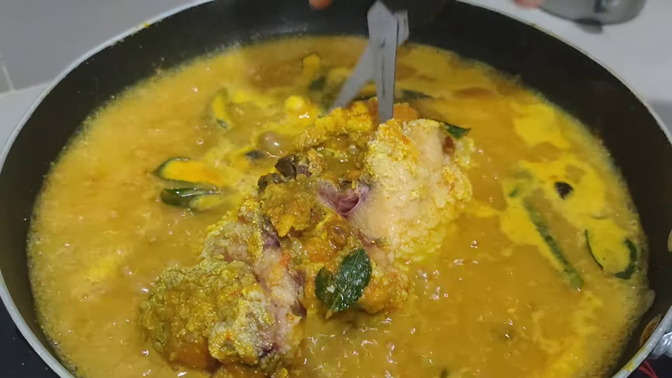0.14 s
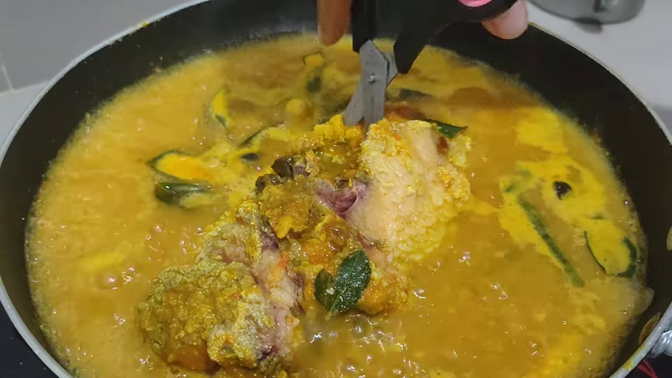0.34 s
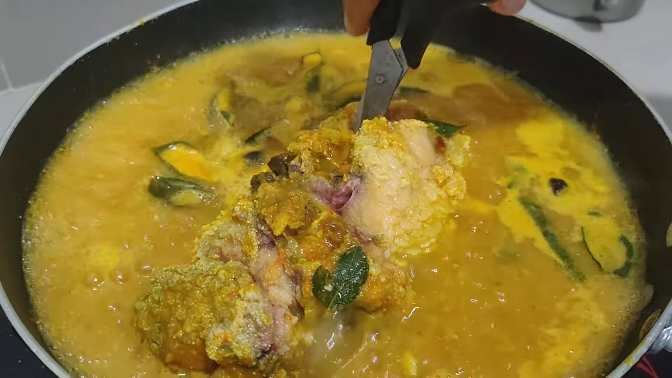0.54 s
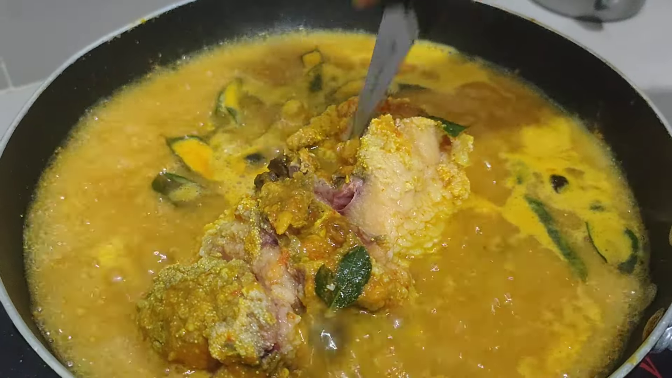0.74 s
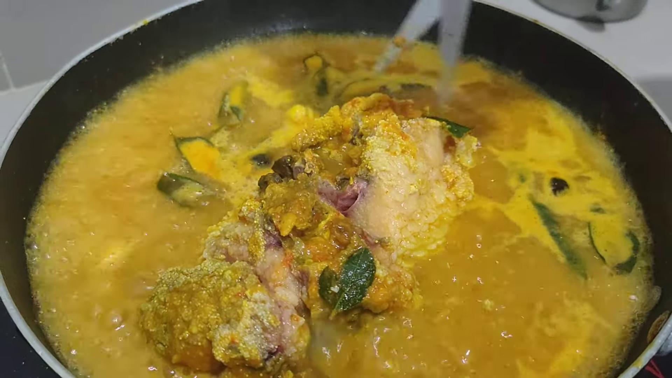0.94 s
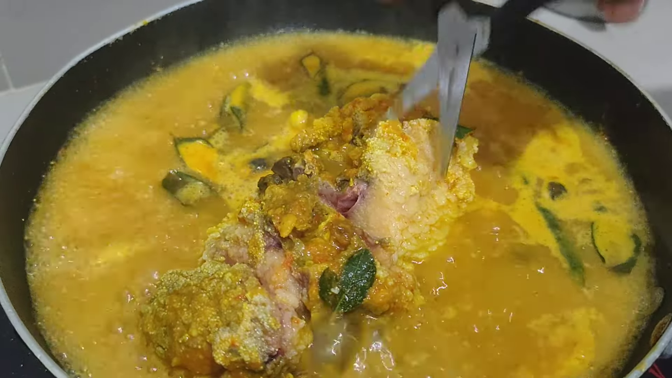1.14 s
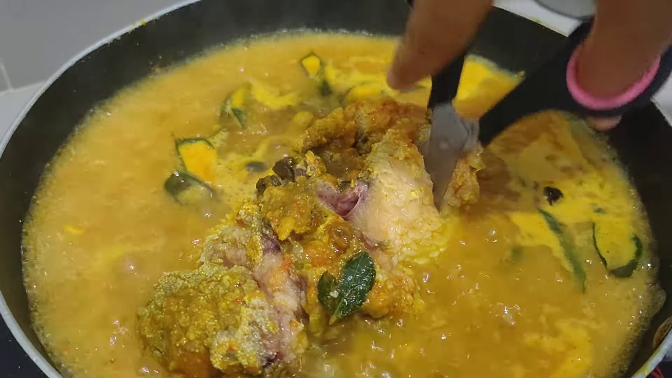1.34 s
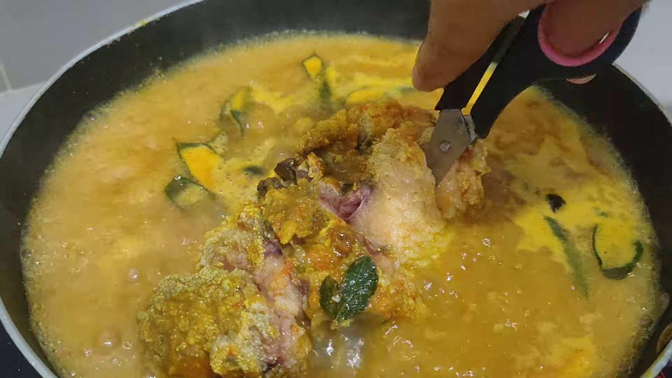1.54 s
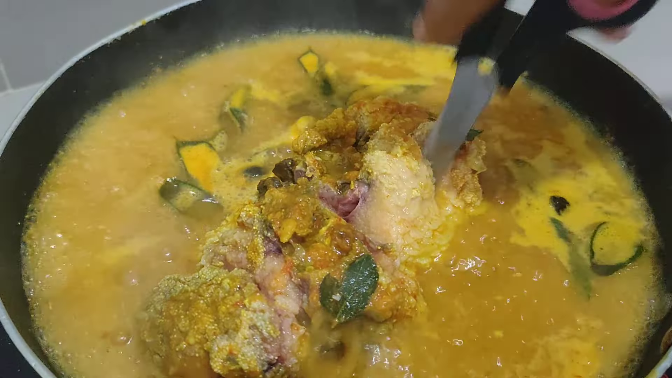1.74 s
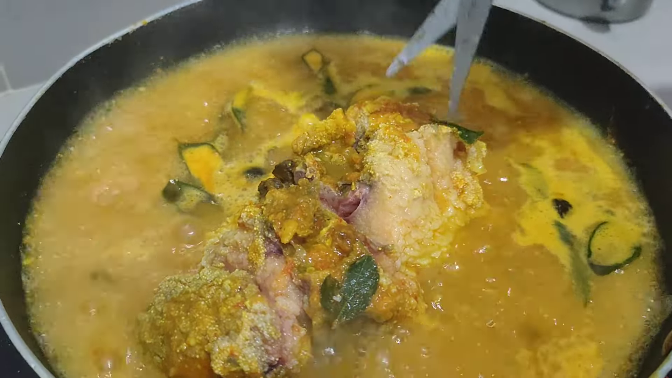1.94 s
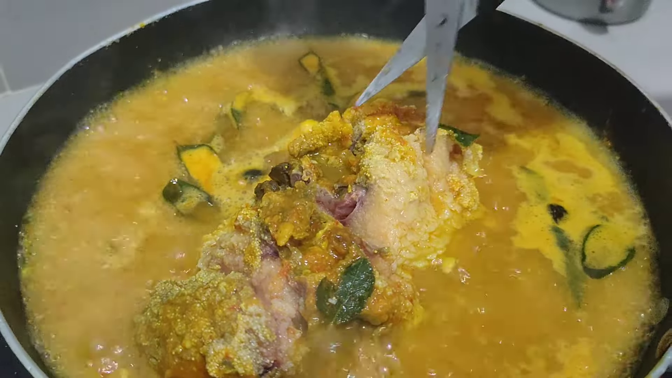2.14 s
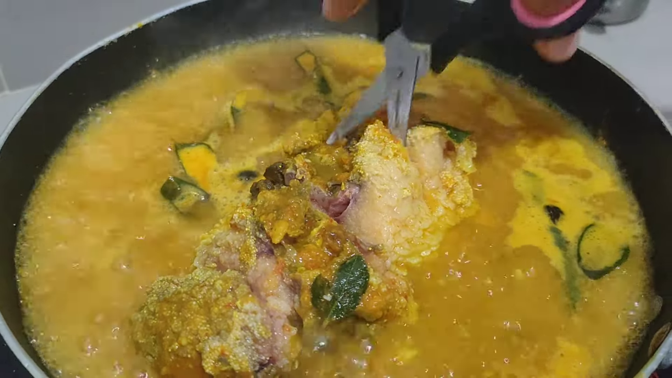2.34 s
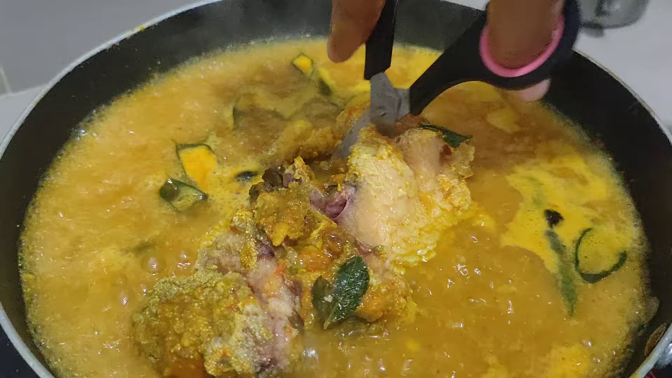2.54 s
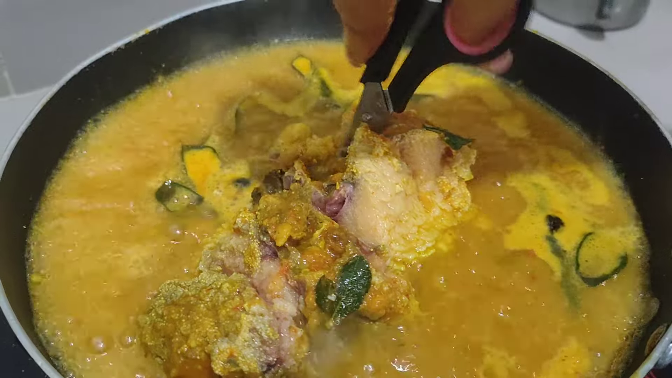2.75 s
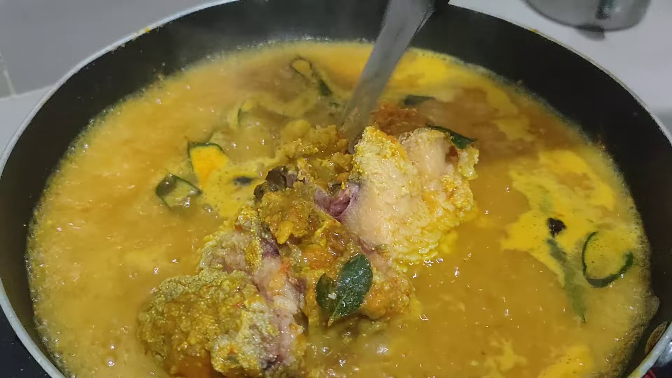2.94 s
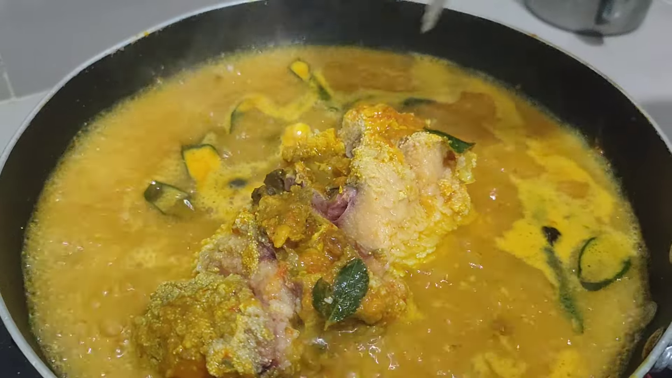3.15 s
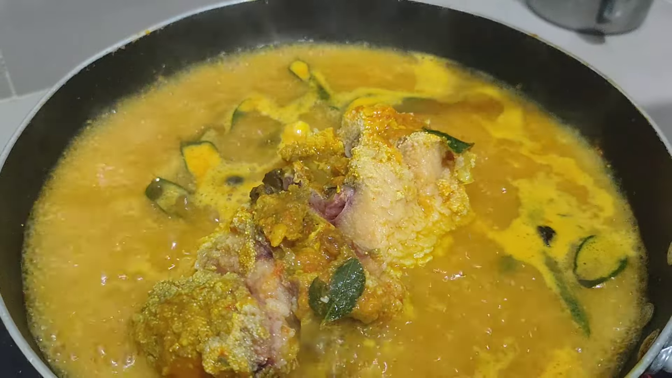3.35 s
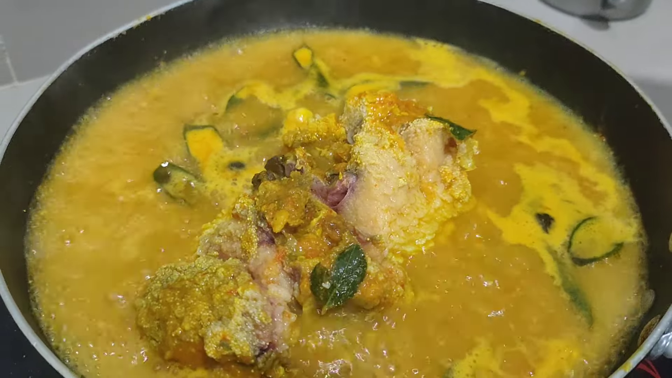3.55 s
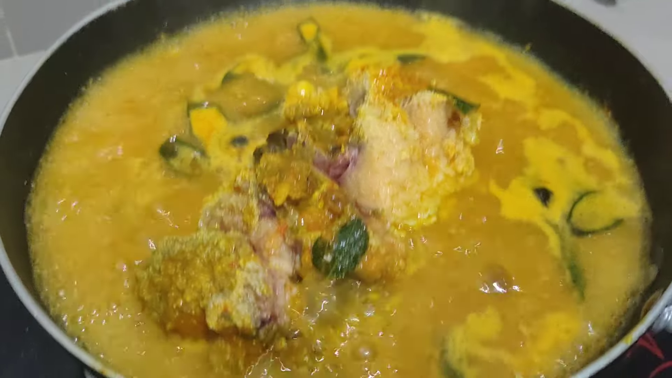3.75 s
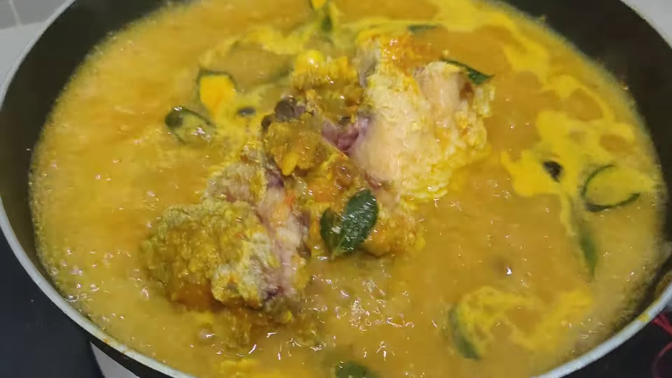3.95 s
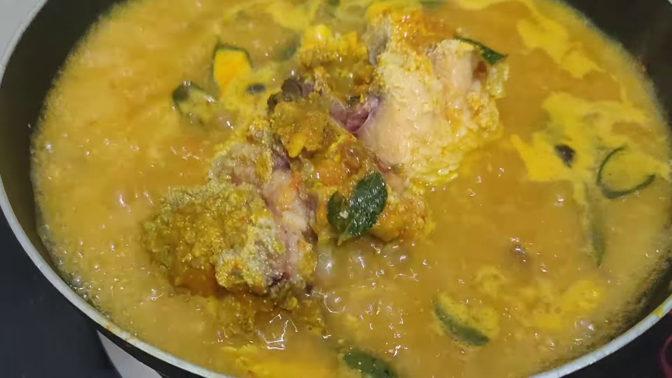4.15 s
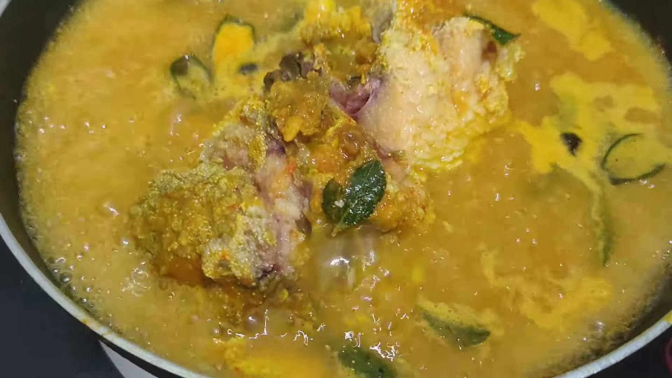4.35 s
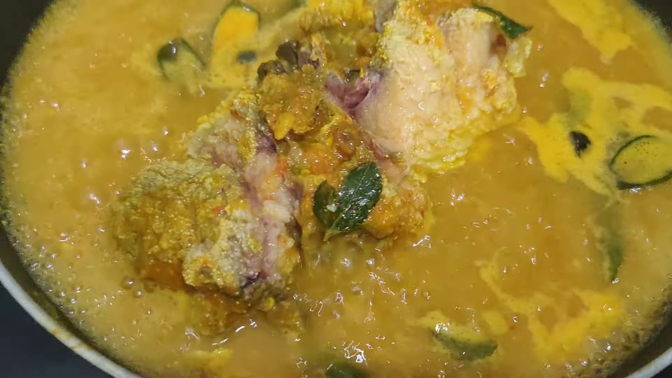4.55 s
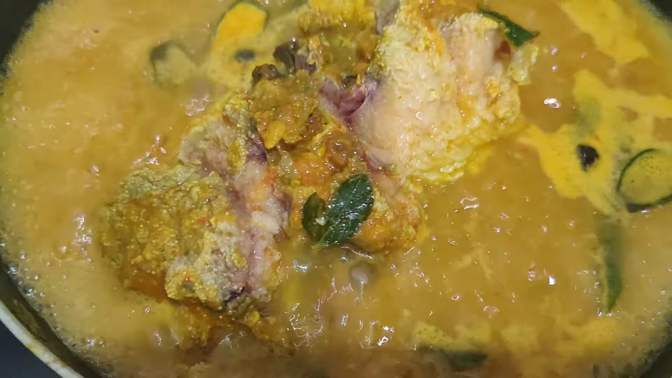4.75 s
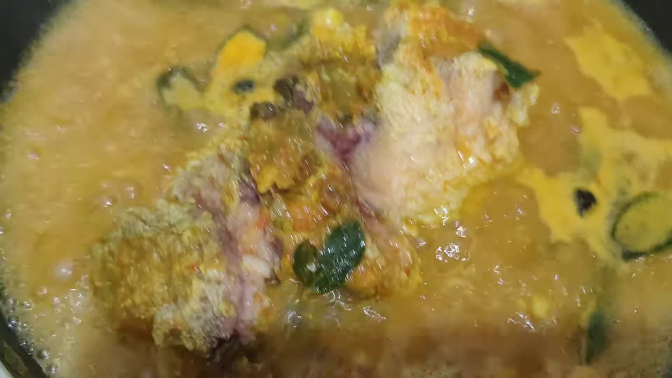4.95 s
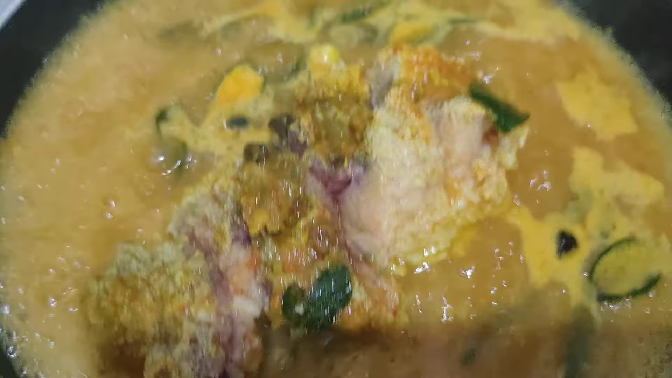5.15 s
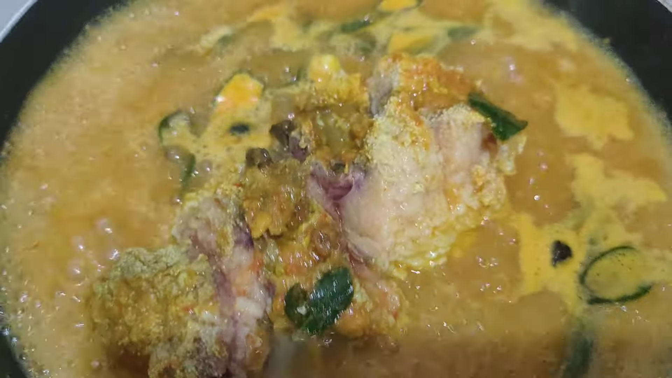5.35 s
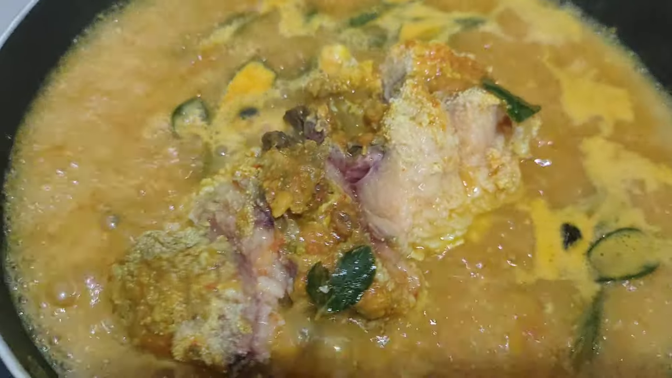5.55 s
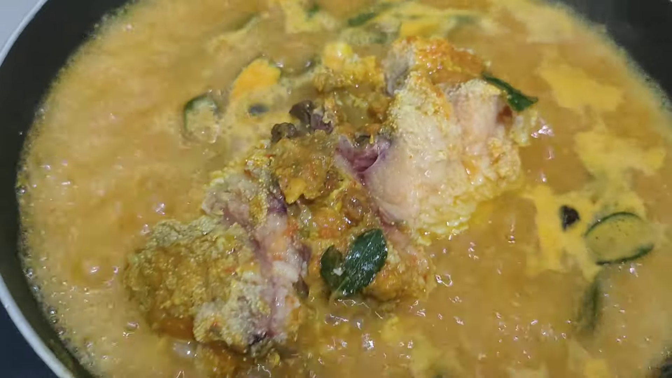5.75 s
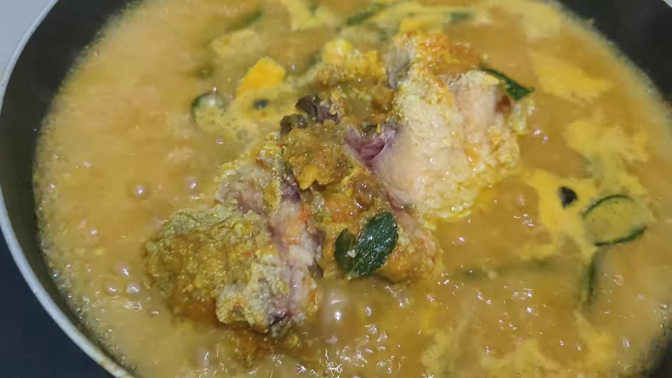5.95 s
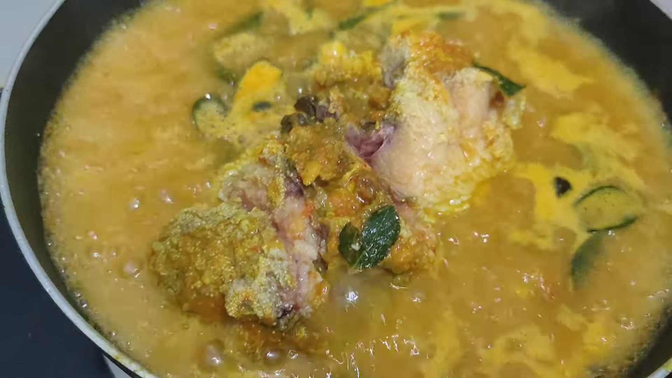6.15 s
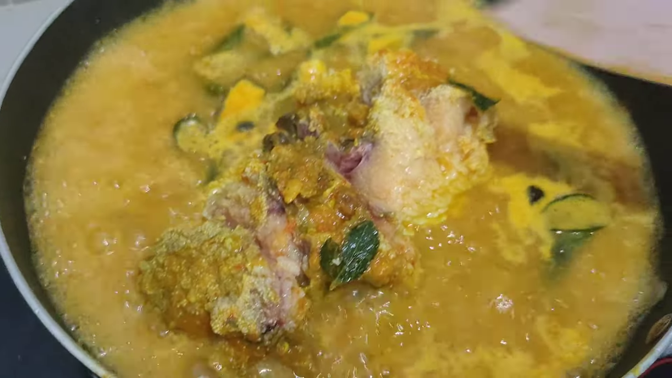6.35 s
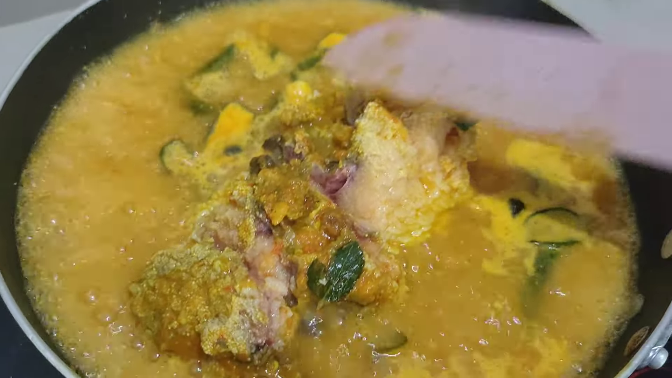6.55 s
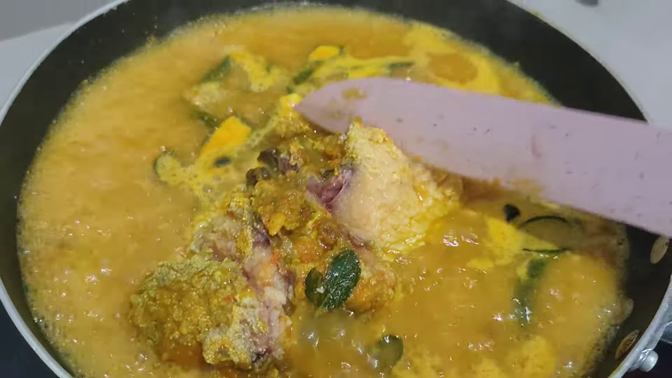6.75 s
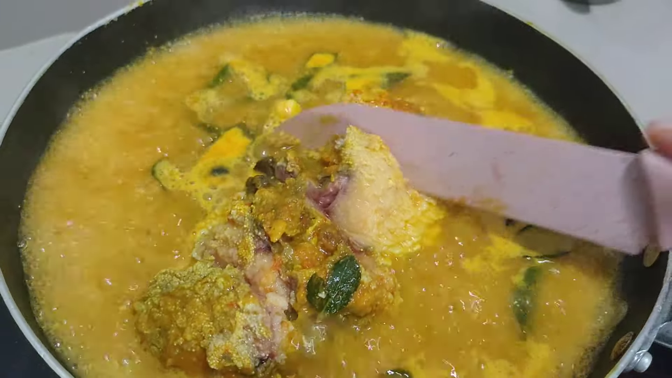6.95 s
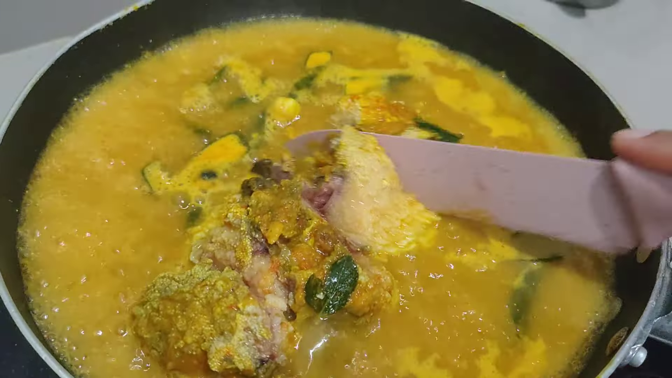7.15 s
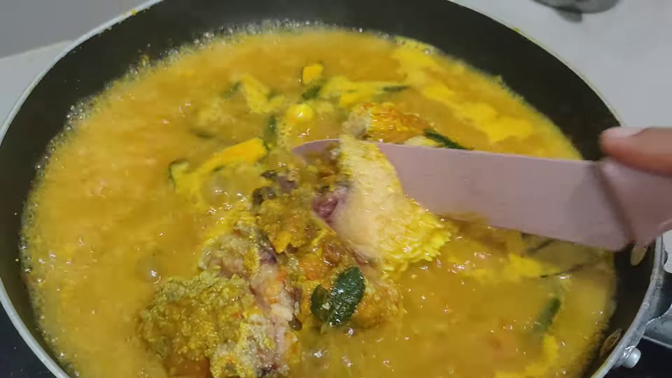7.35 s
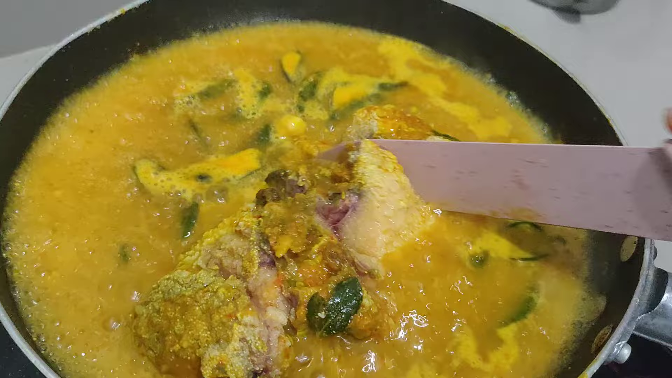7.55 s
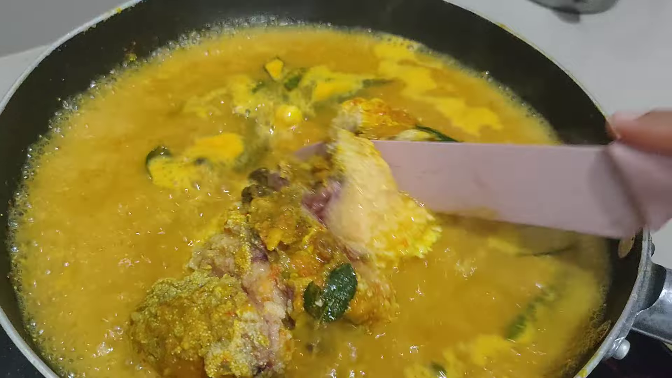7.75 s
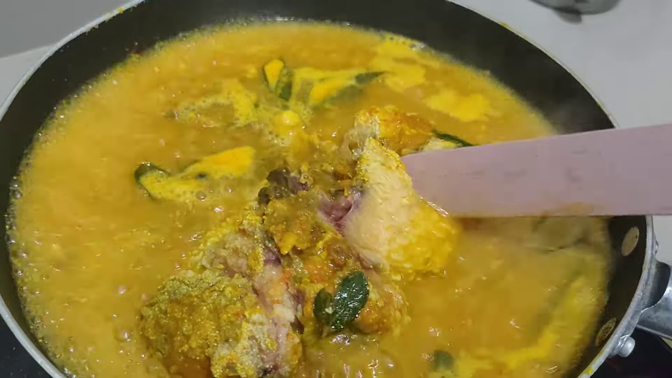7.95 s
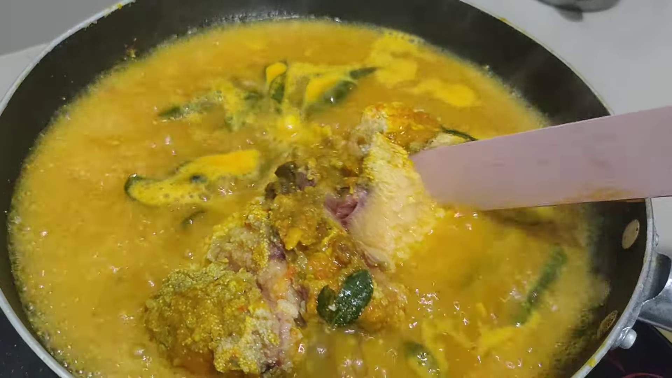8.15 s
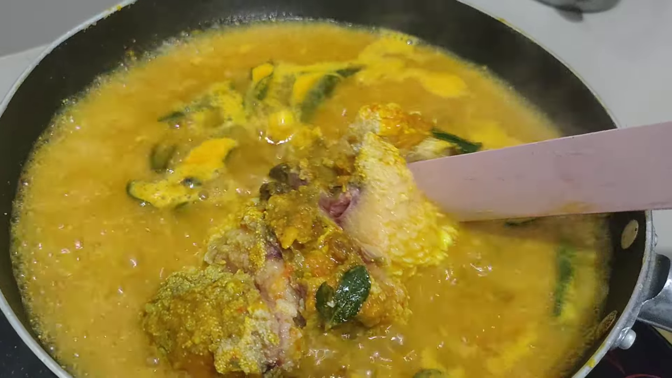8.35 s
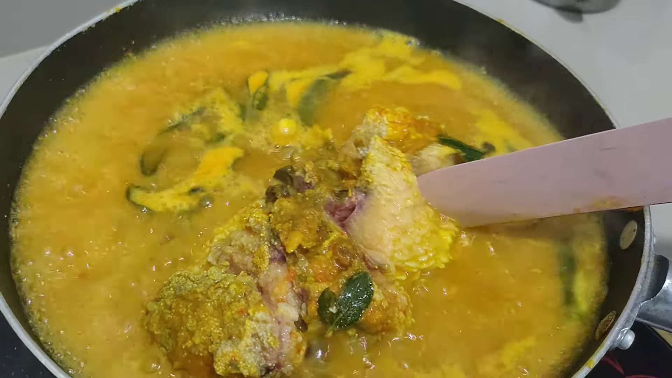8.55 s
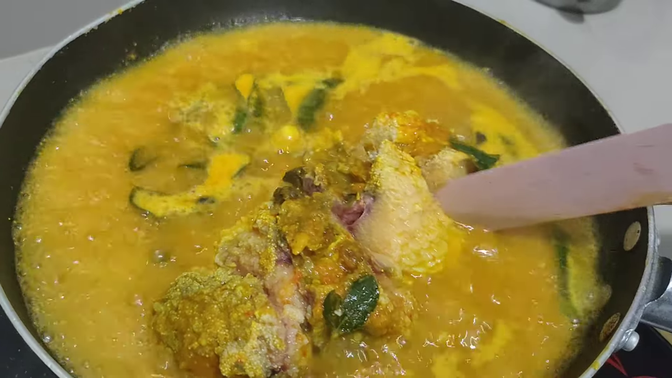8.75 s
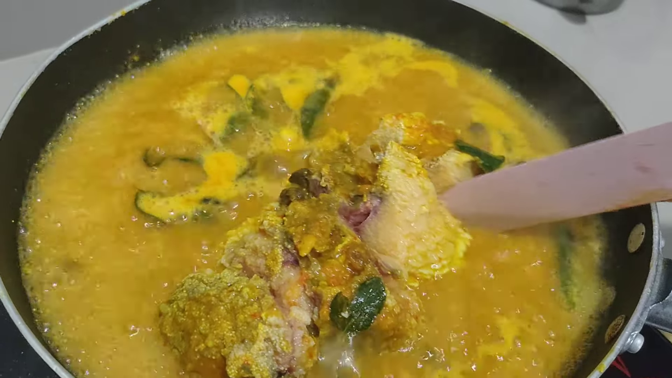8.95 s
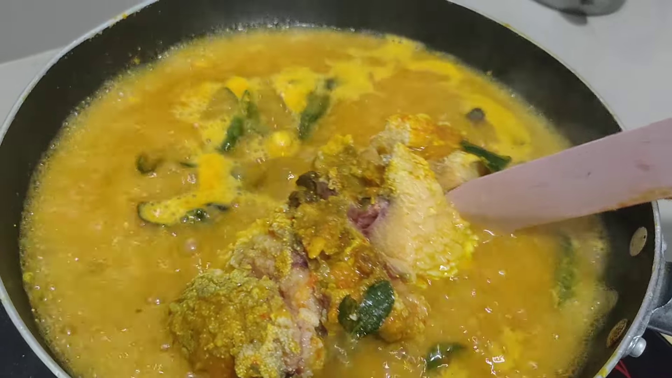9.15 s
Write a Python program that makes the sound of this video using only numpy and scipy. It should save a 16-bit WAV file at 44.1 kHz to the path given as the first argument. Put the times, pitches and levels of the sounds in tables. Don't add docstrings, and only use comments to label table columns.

```python
import sys
import numpy as np
from scipy import signal
from scipy.fft import rfft, irfft, next_fast_len
from scipy.io import wavfile
from scipy.ndimage import uniform_filter1d

SR = 44100
rng = np.random.default_rng(int(sys.argv[2]) if len(sys.argv) > 2 else 0)


def how_loud(loudness_db):
    steps = np.asarray(loudness_db, float) / 20
    return 10 ** steps


def put_to_file(sound):
    columns = np.atleast_2d(sound).T
    safe = np.clip(columns, -1, 1)
    whole_steps = np.round(safe * 32767)
    wavfile.write(sys.argv[1], SR, whole_steps.astype(np.int16))


N = 405279


def rms_one(x):
    return x / np.sqrt(np.mean(x ** 2) + 1e-20)


def in_time(rows):
    s, *columns = np.transpose(rows)
    return [np.interp(np.arange(N) / SR, s, c) for c in columns]


def drift(rate):
    r = np.exp(-80 * np.pi * rate / SR)
    slow = signal.lfilter([1], [1, -2 * r, r * r], rng.standard_normal(N // 40 + 2002))[2000:]
    return np.interp(np.arange(N) / 40, np.arange(len(slow)), rms_one(slow))


def butter(x, order, hz, kind="low"):
    return signal.sosfilt(signal.butter(order, hz, kind, fs=SR, output="sos"), x)


def colour(x, spectrum):
    size = next_fast_len(N)
    hz, level_db = np.transpose(spectrum)
    grid = np.log(np.arange(size // 2 + 1) * SR / size + 1)
    gain = how_loud(np.interp(grid, np.log(hz), level_db, left=-120, right=-120))
    return rms_one(irfft(rfft(x, size) * gain, size)[:N])


def resonate(x, hz, width_hz):
    r = np.exp(-np.pi * width_hz / SR)
    feedback = [1, -2 * r * np.cos(2 * np.pi * hz / SR), r * r]
    return signal.lfilter(np.array([1, 0, -1]) * (1 - r * r) / 2, feedback, x)


def ring(clicks, hz, t60):
    r, w = how_loud(-60 / (t60 * SR)), 2 * np.pi * hz / SR
    return signal.lfilter([0, np.sin(w)], [1, -2 * r * np.cos(w), r * r], clicks + 1e-18)


def add(out, s, sound):
    i = max(round(s * SR), 0)
    out[i:i + len(sound)] += sound[:N - i]


def plop(hz, cycles, start):
    u = np.arange(int(4 * cycles / hz * SR)) * hz / SR / cycles
    swell = u * np.exp(1 - u) * np.exp(-.3 * u ** 2 + 0.7)
    pitch = hz * (1.15 - (1.15 - start) * np.exp(-1.6 * u))
    return swell * np.sin(2 * np.pi * np.cumsum(pitch) / SR)


# start_s, hold_s, drone_db
GATE_OPENINGS = [(0, .1, -68), (0.49, 0.072, -63), (1.0, .1, -65), (1.65, 0.043, -66), (4.5, 0.11, -65),
                 (1.21, 0.12, -56.5), (1.8, 0.058, -59), (2.28, 0.11, -56), (2.57, 0.096, -53.5),
                 (3.07, 0.14, -53.5), (3.65, 0.18, -54.5), (3.95, .32, -55), (4.7, .15, -58),
                 (5.04, 0.11, -51), (5.27, .45, -56), (5.78, 0.14, -49.5), (6.23, .1, -52), (6.7, .2, -50),
                 (7.28, 0.075, -52), (7.57, .08, -48), (7.79, .13, -49), (8.21, 0.068, -57.5),
                 (8.6, 0.16, -55), (8.88, .3, -58)]
# start_s, length_s, depth_db
LULLS = [
    (0.238, .17, 14),
    (0.85, 0.29, 5),
    (3.42, 0.11, 3),
    (4.396, 0.048, 5),
    (6.119, 0.079, 7),
    (7.43, .07, 16),
    (7.968, 0.22, 15),
]


def suppressor():
    open_db_per_s, close_db_per_s, shut_db, lull_edge_s = 171, 140, -76, .03
    t, drone_db = np.arange(N) / SR, np.full(N, float(shut_db))
    for s, hold_s, db in GATE_OPENINGS:
        before_s = np.maximum(s - t, 0)
        after_s = np.maximum(t - s - hold_s, 0)
        drone_db = np.maximum(drone_db, db - open_db_per_s * before_s - close_db_per_s * after_s)
    drone_db = uniform_filter1d(drone_db, int(.06 * SR))
    lull_db = sum(db * np.clip(np.minimum(t - s, s + length - t) / lull_edge_s + 1, 0, 1)
                  for s, length, db in LULLS)
    return drone_db, -61 + .1 * (drone_db + 55.5) - lull_db


# pitch_hz, width_hz, level_db
ROOM_MODES = [(250, 79, 5), (345.2, 21, -4), (502, 50, -2.5)]


def flame(drone_db, rumble_db):
    noise = rng.standard_normal((3, N))
    drone = rms_one(resonate(resonate(noise[0], 100, 20), 96.4, 33))
    second = rms_one(resonate(resonate(noise[1], 168, 21), 163, 45))
    modes = sum(how_loud(db + 2.6 * drift(7)) * rms_one(resonate(resonate(noise[1], hz, width), hz, 3.06 * width))
                for hz, width, db in ROOM_MODES)
    stir_db = 16 * np.exp(-((np.arange(N) / SR - 6.62) / .07) ** 2)
    sub = rms_one(butter(noise[2], 2, 50))
    low = how_loud(drone_db) * drone + how_loud(0.59 * drone_db + .4 * rumble_db - 3) * second
    rumble = how_loud(rumble_db + 4.0 + 1.8 * drift(16)) * rms_one(modes)
    return low + rumble + how_loud(stir_db - 71.0) * sub


def kitchen(x, t60):
    t = np.arange(int(.4 * SR)) / SR
    tail = rng.standard_normal(len(t)) * how_loud(-60 * t / t60) * (t > .008)
    tail = butter(tail, 2, [300, 2300], "band")
    return signal.oaconvolve(x, tail / np.sqrt(np.sum(tail ** 2)))[:N]


# pitch_hz, level_db (per Hz)
SEETHE_SPECTRUM = [(290, -39.5), (500, -6.5), (637, -5.5), (899, -5), (1500, -0.5), (2360, -4.5),
                   (2600, -8), (3380, -48), (5720, -120)]


def seethe():
    return colour(rng.standard_normal(N) * how_loud(3.9 * drift(30)), SEETHE_SPECTRUM)


# pitch_hz, level_db (per Hz)
FIZZ_SPECTRUM = [(1290, -36.5), (2200, -13.5), (2380, -11.5), (3520, -8), (4030, -7), (5140, -14),
                 (6480, -2.5), (6900, 0.5), (7590, -6.5), (8500, -40.5), (11000, -67), (18700, -120)]


def fizz():
    sizes = how_loud(3.9 * np.minimum(rng.exponential(1, N), 5))
    cracks = sizes * rng.choice([-1, 1], N) * (rng.random(N) < 2500 / SR)
    hiss = rng.standard_normal(N) * how_loud(1.57 * drift(23))
    return colour(hiss + 0.69 * rms_one(cracks), FIZZ_SPECTRUM)


def small_bubbles(per_s):
    sizes = how_loud(3.6 * np.minimum(rng.exponential(1, N), 3)) * rng.choice([-1, 1], N)
    born = rng.random(N) < per_s * how_loud(3.5 * drift(22)) / SR
    pitches, dealt = np.geomspace(750, 2000, 10), rng.integers(0, 10, N)
    return rms_one(sum(signal.oaconvolve(sizes * born * (dealt == k), plop(hz, cycles=1.21, start=0.46))[:N]
                       for k, hz in enumerate(pitches)))


# start_s, level_4khz_db, level_7khz_db
SPITS = [(0.4816, -27.5, -18.5), (1.0853, -50, -38), (1.416, -52, -29), (1.4285, -46, -35),
         (1.4371, -30.5, -25.5), (1.6591, -41.5, -39), (1.962, -39, -30), (2.0134, -36.5, -54),
         (2.355, -43, -36), (2.6526, -32.5, -26.5), (2.837, -39.5, -48), (3.0198, -43, -33),
         (3.516, -40.5, -51), (3.8157, -49, -33), (3.9192, -37, -45.5), (3.9875, -49, -31),
         (4.1416, -44, -30.5), (4.4453, -42, -36), (4.484, -33.5, -34), (4.754, -38, -36),
         (5.1945, -35, -51), (6.59, -40, -46), (7.3176, -45, -30), (7.6518, -34.5, -41),
         (7.6662, -47.5, -34), (8.3697, -42, -41), (8.664, -47, -26), (8.948, -48, -34),
         (8.9837, -41.5, -31), (9.1356, -50, -34)]


def spits():
    low, high, t = np.zeros(N), np.zeros(N), np.arange(int(.05 * SR)) / SR - .01
    crack = np.where(t < 0, np.exp(t / 0.00023), np.exp(-t / 0.00082))
    spray = 0.13 * np.where(t < 0, np.exp(-(t / 0.0059) ** 4), np.exp(-t / 0.012))
    # middle and spread of start_s, level_4khz_db, level_7khz_db
    middle, spread = [N / SR / 2, -49.5, -42], [N / SR / 2, 3.5, 3.5]
    stray = rng.uniform(-1, 1, (30, 3)) * spread + middle
    rows = np.vstack([SPITS, stray])
    for (s, low_db, high_db), noise in zip(rows, rng.standard_normal((len(rows), 2, len(t)))):
        burst = (crack + spray) * np.tanh(0.63 * noise)
        add(low, s + t[0], how_loud(low_db + 21) * burst[0])
        add(high, s + t[0], how_loud(high_db + 18.0) * burst[1])
    port_low = resonate(resonate(low, 3770, 1200), 3500, 3000)
    port_high = resonate(resonate(high, 6670, 1500), 6680, 1500)
    return port_low + port_high


# start_s, peak_db, pitch_hz
TINY_BUBBLES = [
    (2.0118, -34, 3450),
    (2.9127, -35, 2620),
    (2.213, -39.5, 3500),
    (2.531, -38, 4000),
    (4.0444, -37, 2570),
    (7.7154, -40, 2390),
]
# start_s, peak_db, pitch_hz
LONE_BUBBLES = [
    (0.278, -41, 1470),
    (0.726, -42, 926),
    (8.04, -42, 800),
    (8.078, -41, 773),
    (8.322, -39.5, 1520),
]


def drops():
    out = np.zeros(N)
    for s, db, hz in list(TINY_BUBBLES) + list(LONE_BUBBLES):
        add(out, s, how_loud(db - 3) * plop(hz, cycles=2.3, start=0.65))
    return out


# start_s, peak_db, brightness_db (per octave above 1 kHz), thud_db
KNOCKS = [
    (7.5122, -12.5, 2, -43),
    (7.5158, -13, 2.0, -49),
    (7.5668, -10.5, -10.5, -33),
    (7.584, -18, -20, -32),
    (6.835, -29, 0, -44),
]
# pitch_hz, level_db, t60_s
PAN_MODES = [(468, -13.5, 0.024), (650, -18, 0.022), (889, -9, 0.048), (1040, -8.5, 0.025),
             (1190, -9, 0.025), (1400, -12, 0.024), (1778, -4, 0.02), (2085, -2, 0.024)]
# pitch_hz, level_db, t60_s
STOVE_THUD = [(106, -8.5, .3), (254, 3, 0.14), (346, 2.5, 0.2)]


def knocks():
    out, clink = np.zeros(N), np.zeros(N)
    chance = rng.normal(0, 2.0, (len(KNOCKS), len(PAN_MODES)))
    s, db, bright_db, thud_db = np.transpose(KNOCKS)
    at, t = np.round(s * SR).astype(int), np.arange(int(.04 * SR)) / SR
    for k, (hz, level_db, t60) in enumerate(PAN_MODES):
        clicks = np.zeros(N)
        clicks[at] = how_loud(db + level_db + bright_db * max(np.log2(hz / 1000), 0) + chance[:, k])
        out += ring(clicks, hz, t60) * (-1) ** k
    out = signal.sosfilt(signal.ellip(2, 1, 18, [330, 2300], "band", fs=SR, output="sos"), out)
    for hz, level_db, t60 in STOVE_THUD:
        clicks = np.zeros(N)
        clicks[at] = how_loud(thud_db + level_db)
        out += ring(signal.lfilter([.02], [1, -.98], clicks), hz, t60)
    for when, level_db, noise in zip(s, db + 2.4 * bright_db, rng.standard_normal((len(s), len(t)))):
        add(clink, when, how_loud(level_db - 4) * np.tanh(noise) * np.exp(-t / 0.004))
    return out, sum(resonate(resonate(clink, hz, 820), hz, 1100) for hz in (4100, 5700, 6600))


NEARS_S = [3.7, 4.0]


def vents(listed_s):
    gap_s, level_db, spread_db, low_hz, high_hz, clear_s = .09, -39, 2, 850, 1650, .02
    gap, pair, size, pitch = rng.random((300, 4)).T
    s = np.cumsum(np.where(pair < .2, .007, gap_s * (.4 + 1.2 * gap)))
    free = (np.abs(s[:, None] - listed_s).min(axis=1) > clear_s) & (s < N / SR - .01)
    for start, length, _ in LULLS:
        free &= (s < start) | (s > start + length)
    peak_db = level_db + spread_db * (2 * size - 1) + 2.0 * np.interp(s, NEARS_S, [0, 1])
    return np.transpose([s, peak_db, low_hz * (high_hz / low_hz) ** pitch])[free]


TEAR_S = .005


def splash(noise):
    t = np.arange(len(noise)) / SR - TEAR_S
    grains = butter(noise ** 3, 3, [450, 2150], "band")
    return rms_one(grains) * np.exp(np.where(t < 0, 2.2 * t / TEAR_S, -t / 0.009))


# start_s, peak_db,
# pitch_hz
PLOPS = [(0.078, -35.5, 1280), (0.164, -36.5, 1240), (0.3482, -28.5, 1040), (0.4574, -32.5, 1540),
         (0.8638, -34, 1770), (0.96, -35, 1570), (1.155, -33, 1400), (1.2012, -27.5, 1470),
         (1.3148, -31.5, 1300), (1.351, -30, 1216), (1.5246, -28.5, 1410), (1.534, -27.5, 1720),
         (1.6134, -24, 1158), (1.7378, -34, 1580), (1.9608, -29, 1293), (2.0114, -35, 1104),
         (2.1907, -34, 1550), (2.2512, -37, 1090), (2.2972, -33.5, 1460), (2.5012, -29.5, 1350),
         (2.5306, -29, 1180), (2.648, -31, 1470), (2.3542, -36.5, 1070), (2.6927, -38.5, 1301),
         (2.9124, -38, 1190), (2.8343, -31.5, 815), (3.02, -35, 1230), (3.2702, -35, 1700),
         (3.3485, -34, 1360), (3.5163, -35, 748),
         (3.716, -29, 1600), (3.8872, -30.5, 1060), (3.9866, -33.5, 1160), (4.0278, -29, 1680),
              (4.0959, -27, 1160), (4.2049, -31.5, 1230), (4.2764, -28.5, 1774), (4.382, -29.5, 1320),
              (4.4434, -29.5, 1820), (4.4843, -32, 990), (4.5283, -32.5, 1530), (4.661, -32.5, 1070),
              (4.755, -27, 1500), (4.8005, -25.5, 1830), (4.881, -24.5, 1370), (4.925, -24, 1750),
              (5.01, -23, 1636), (5.0932, -30.5, 1230), (5.1916, -27.5, 1530), (5.2458, -23, 1707),
              (5.5259, -25, 1650), (5.5344, -25, 1370), (5.5818, -27.5, 1440), (5.6184, -26, 1680),
              (5.7298, -28.5, 1160), (5.8077, -27.5, 1580), (5.9117, -32, 1590), (5.957, -25.5, 1700),
              (6.0461, -29, 1362), (6.0886, -31, 1040),
         (6.367, -34, 1190), (6.4233, -34.5, 1360), (6.5532, -29, 1360), (6.663, -32, 1100),
               (6.5891, -33, 1000), (6.6854, -34, 1500), (6.8897, -33.5, 1460), (7.3046, -32.5, 1650),
               (6.7404, -28, 1640), (6.8394, -27, 1120), (6.8484, -29, 860), (6.9608, -30, 1370),
               (7.1216, -26, 1530), (7.188, -29.5, 1300), (7.3124, -30.5, 720), (7.363, -26.5, 1850),
               (7.6022, -30, 920), (7.6517, -27.5, 1560), (7.752, -25.5, 1470), (7.9049, -28, 1650),
               (7.9698, -31.5, 1660), (8.3696, -30.5, 1410), (8.419, -35, 1250), (8.508, -23.5, 1876),
               (8.6183, -28.5, 1880), (8.6656, -35, 1320), (8.9006, -26.5, 1380), (8.9388, -33.5, 1439),
               (9.0574, -32.5, 1570), (9.1594, -33.5, 1080)]


def big_bubbles():
    listed = np.array(PLOPS)
    out, chance = np.zeros(N), rng.random((400, 5))
    patter = rng.standard_normal((400, int(.05 * SR)))
    bursts = np.vstack([listed, vents(listed[:, 0])])
    for (s, db, hz), (a, b, c, d, e), noise in zip(bursts, chance, patter):
        cycles = (1.254 + 0.67 * a) * min(hz / 1250, 1)
        gulp_db = np.interp(s, NEARS_S, [-47, -42]) + .4 * (db + 29.5) + 4.5 * (2 * d - 1)
        gulp = min((hz / 1100) ** 4, 1) * plop(420 + 250 * c, cycles=0.79, start=0.79)
        splash_db = db - 16 + 3 * (2 * e - 1)
        add(out, s - 0.961 * cycles / hz, how_loud(db - 6.0) * plop(hz, cycles, start=0.48 + 0.46 * b))
        add(out, s - .0022, how_loud(gulp_db - 1.5) * gulp)
        add(out, s - TEAR_S, how_loud(splash_db) * splash(noise))
    return out


# pitch_hz, width_hz, level_db
PAN_AIR = [(543, 32, 4.5), (900, 130, 1), (1190, 96, 2.5), (1530, 240, 2.5)]


def pan_hollow(x):
    echoed = x.copy()
    for lag_s, echo_db in [(.0034, -14.5), (.0071, -18.5)]:
        add(echoed, lag_s, how_loud(echo_db) * x)
    return echoed + sum((how_loud(db) - 1) * resonate(echoed, hz, width) for hz, width, db in PAN_AIR)


def distance(low, high):
    closer = np.interp(np.arange(N) / SR, NEARS_S, [0, 1])
    depth = np.clip(.8 - .1 * closer + .25 * drift(2), 0, .98)
    out = 0
    for share, edge_hz, notch_hz in [(1 - closer, 2250, 2390), (closer, 2600, 2800)]:
        heard = butter(low, 4, edge_hz) + high
        out = out + share * (heard - depth * resonate(heard, notch_hz, 260))
    return out


# start_s, small_bubbles_db, fizz_db
SIMMER = [
    (0.0, -53.5, -53.5),
    (0.92, -54.5, -52.5),
    (1.2, -51.5, -52),
    (3.61, -54, -52.5),
    (4.12, -51, -52.5),
    (8.32, -52, -53.5),
    (9.19, -49.5, -52),
]


def scene():
    bubbles_db, fizz_db = in_time(SIMMER)
    small = butter(small_bubbles(per_s=220), 3, 560, "high")
    sauce = pan_hollow(big_bubbles() + how_loud(bubbles_db - 4) * small)
    blows, clink = knocks()
    room = how_loud(-22.5) * kitchen(sauce, t60=.2) + how_loud(-20) * kitchen(blows, t60=.3)
    low = sauce + butter(blows, 4, 90, "high") + room + how_loud(bubbles_db - 3.5) * seethe()
    high = butter(clink + spits(), 6, 7700) + how_loud(fizz_db) * fizz()
    return (distance(low, high) + drops() + flame(*suppressor()))[None]


def band_limit(x):
    return signal.sosfilt(signal.butter(12, 8740, fs=SR, output="sos"), x)


def record(dry):
    thin = butter(dry, 2, 62, "high")
    edge = butter(thin, 6, 7900)
    cut = signal.sosfilt(signal.ellip(6, 1, 45, 8200, fs=SR, output="sos"), edge)
    mix = cut + how_loud(-101) * rng.standard_normal(dry.shape)
    return band_limit(mix)


dry = scene()
out = record(dry)
put_to_file(out)
```